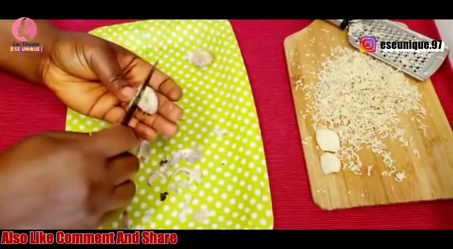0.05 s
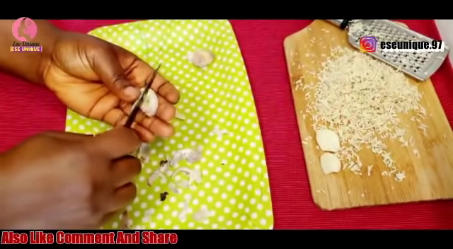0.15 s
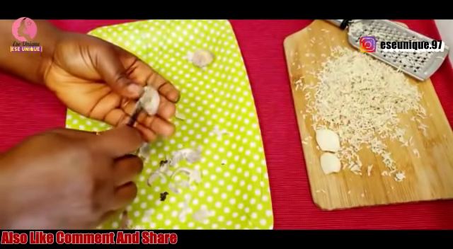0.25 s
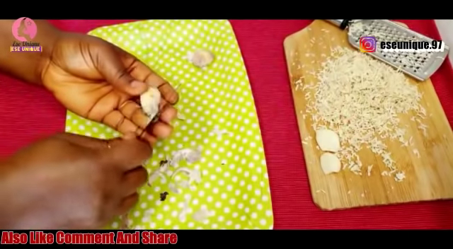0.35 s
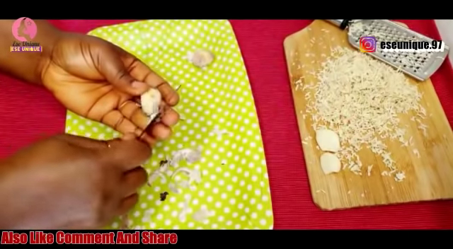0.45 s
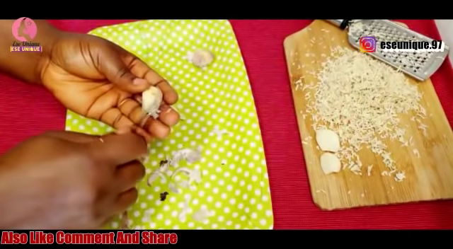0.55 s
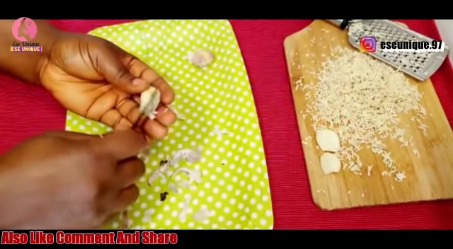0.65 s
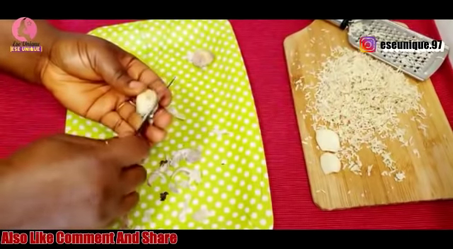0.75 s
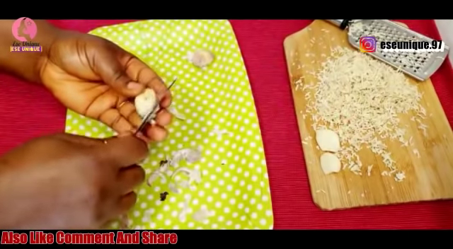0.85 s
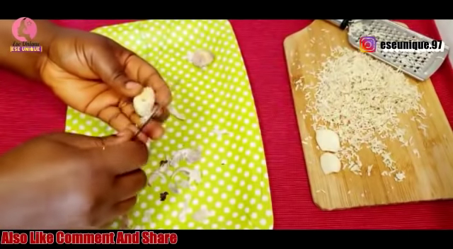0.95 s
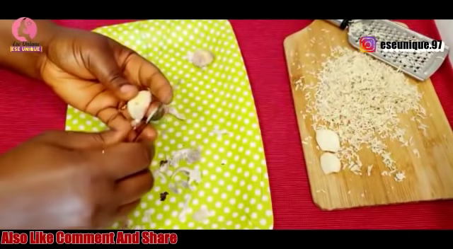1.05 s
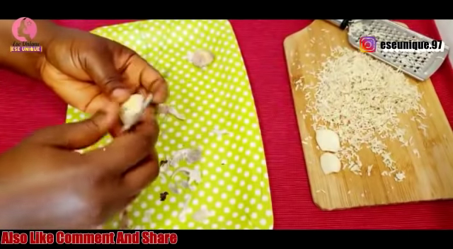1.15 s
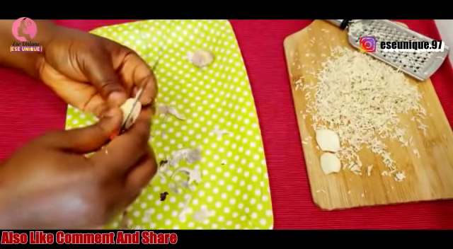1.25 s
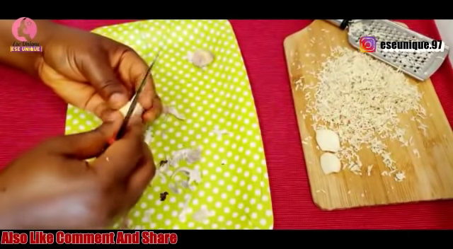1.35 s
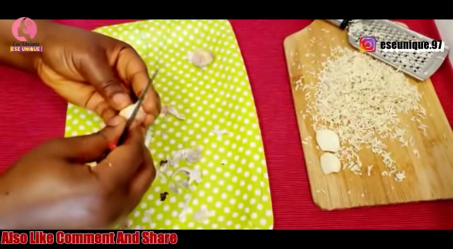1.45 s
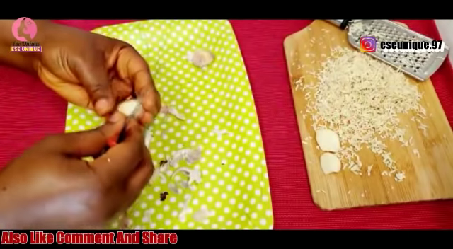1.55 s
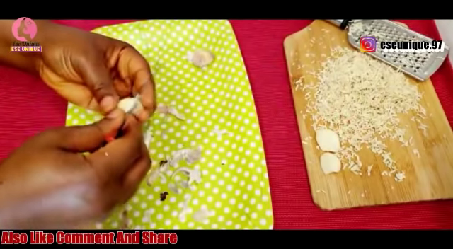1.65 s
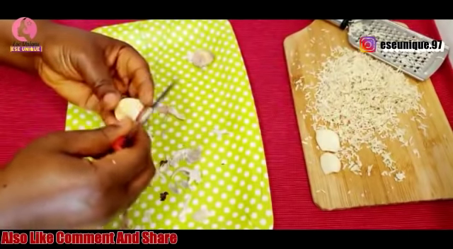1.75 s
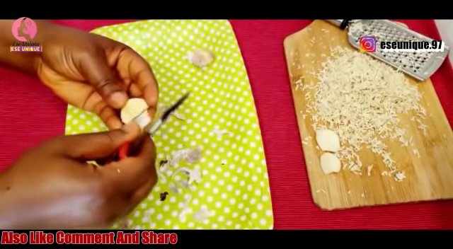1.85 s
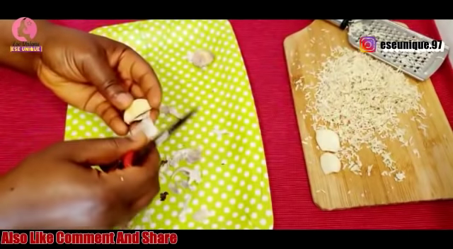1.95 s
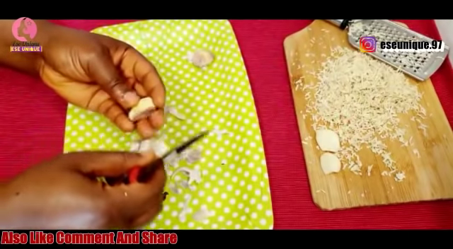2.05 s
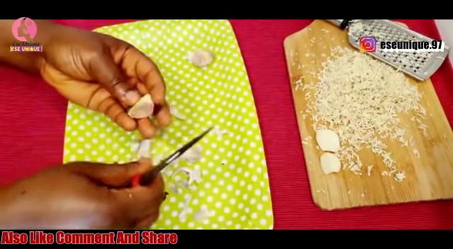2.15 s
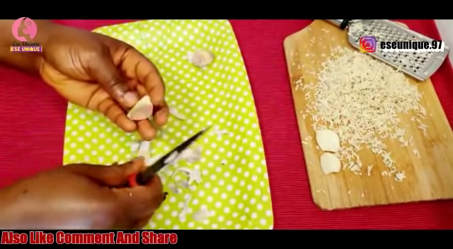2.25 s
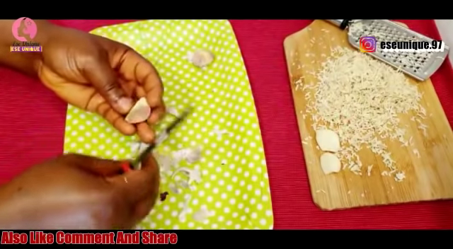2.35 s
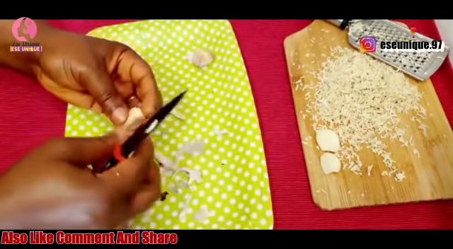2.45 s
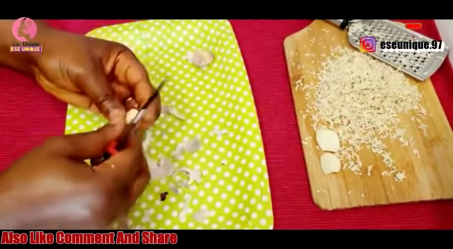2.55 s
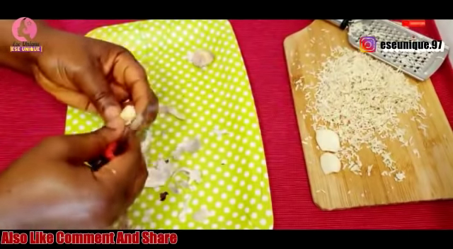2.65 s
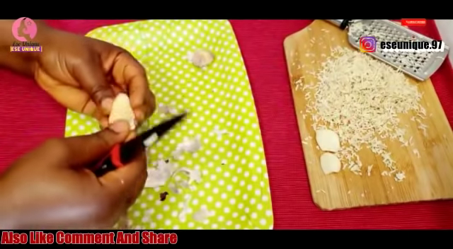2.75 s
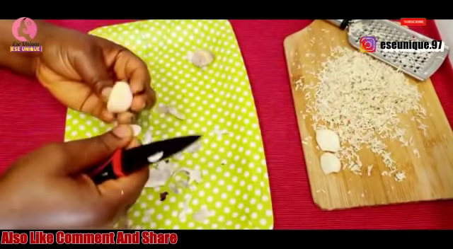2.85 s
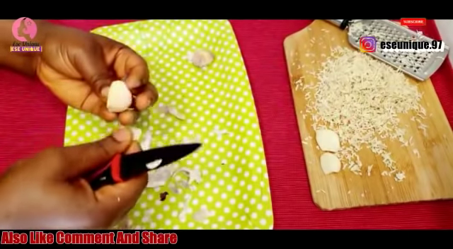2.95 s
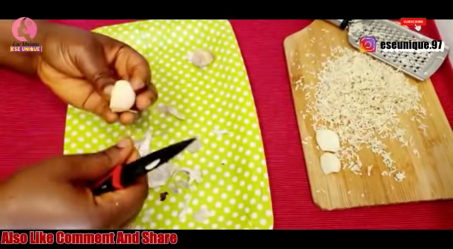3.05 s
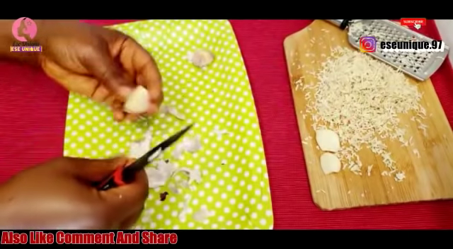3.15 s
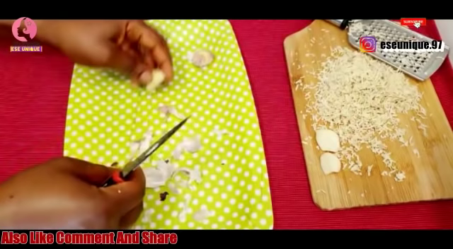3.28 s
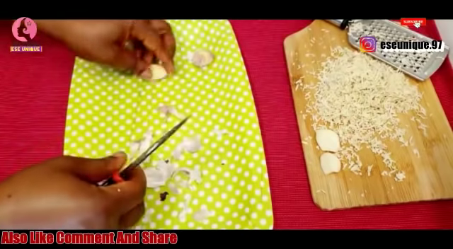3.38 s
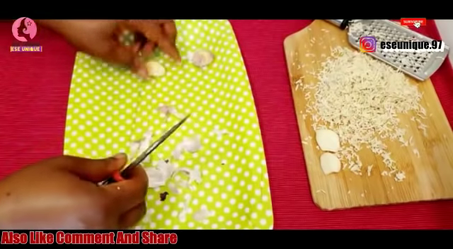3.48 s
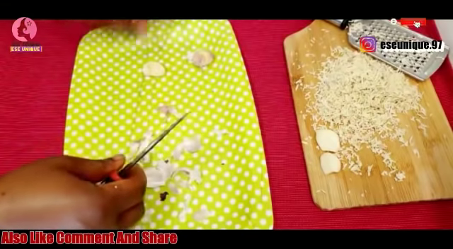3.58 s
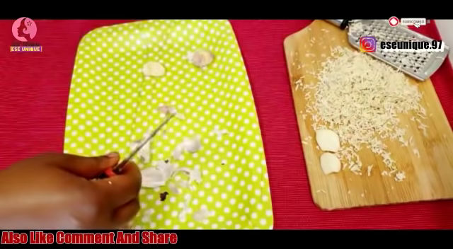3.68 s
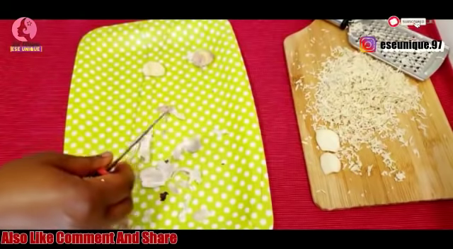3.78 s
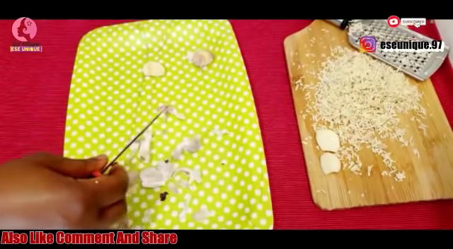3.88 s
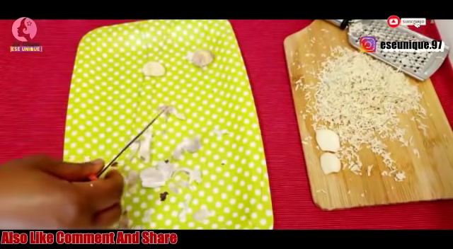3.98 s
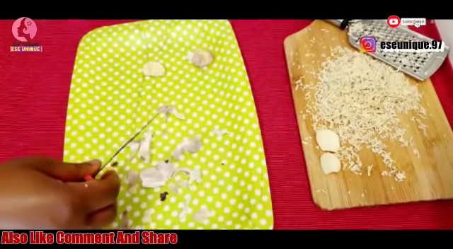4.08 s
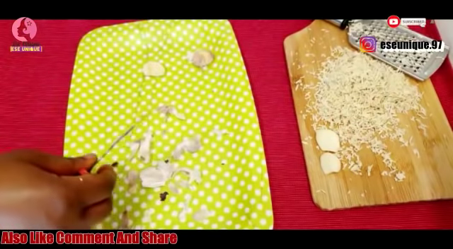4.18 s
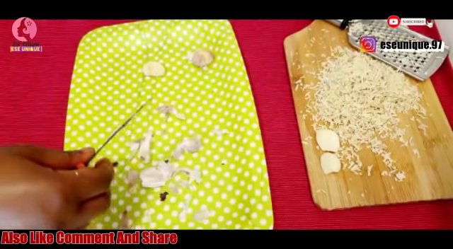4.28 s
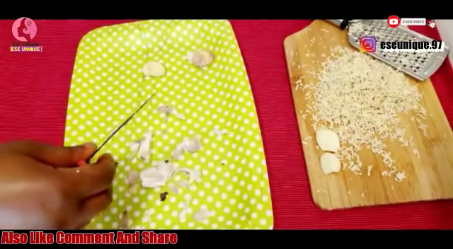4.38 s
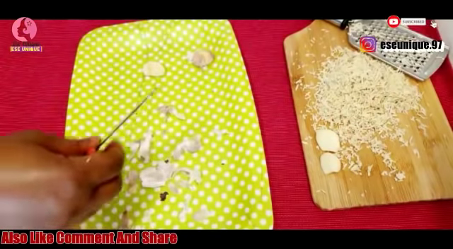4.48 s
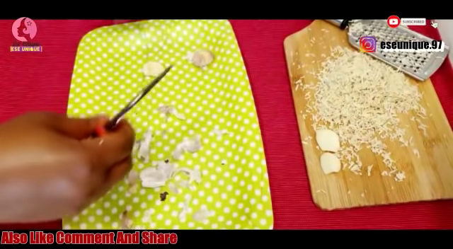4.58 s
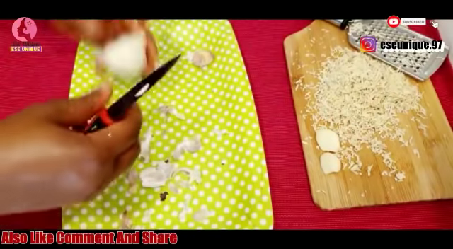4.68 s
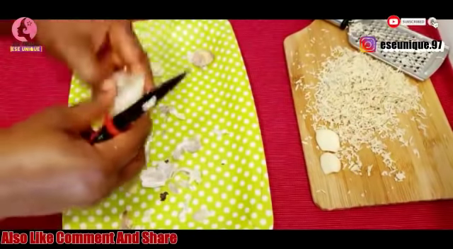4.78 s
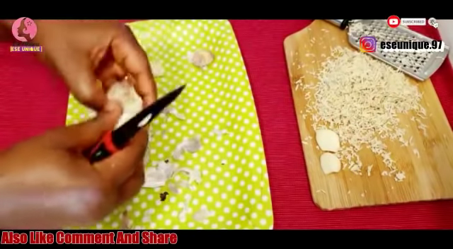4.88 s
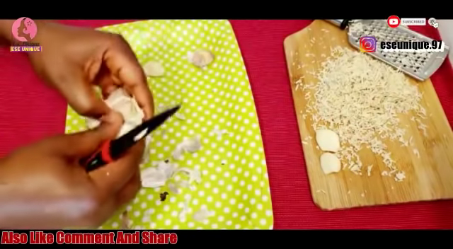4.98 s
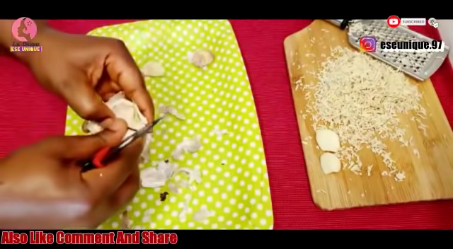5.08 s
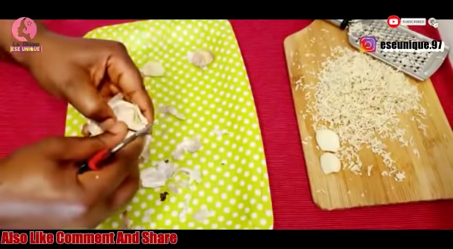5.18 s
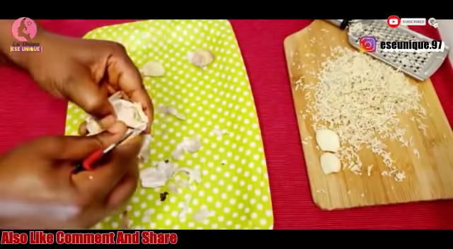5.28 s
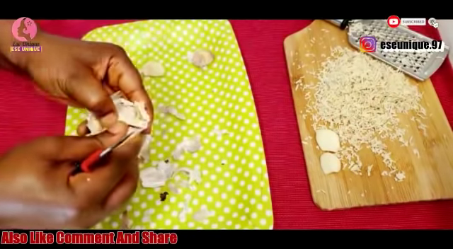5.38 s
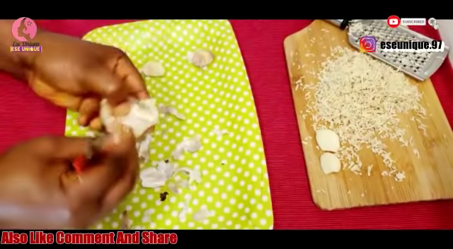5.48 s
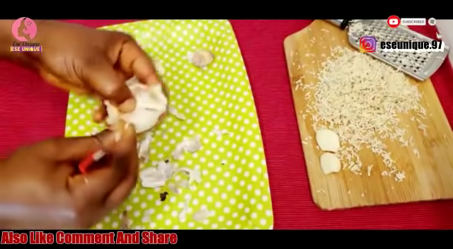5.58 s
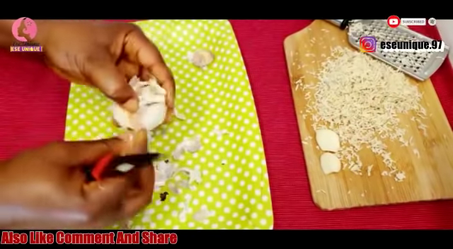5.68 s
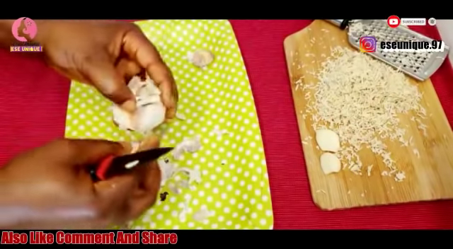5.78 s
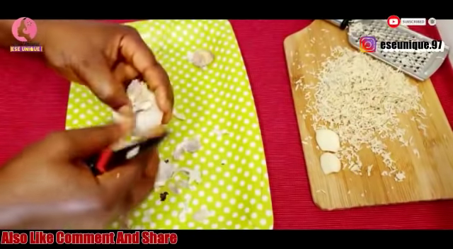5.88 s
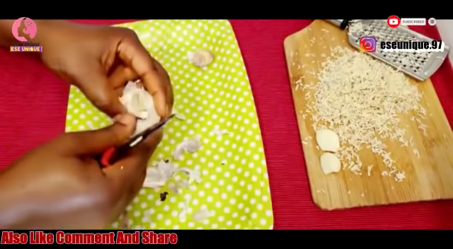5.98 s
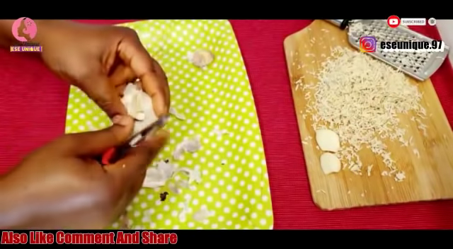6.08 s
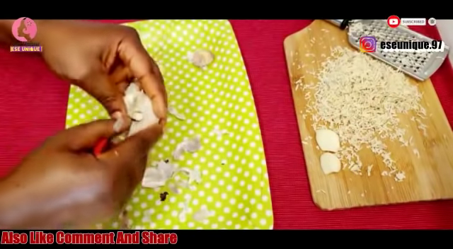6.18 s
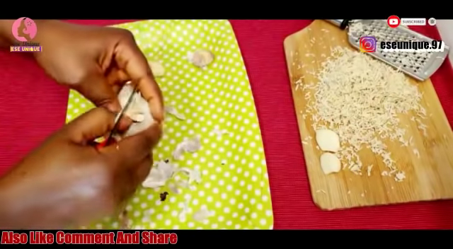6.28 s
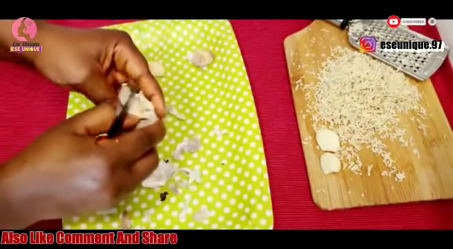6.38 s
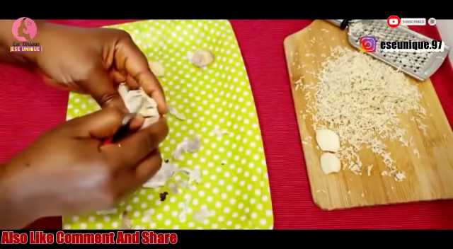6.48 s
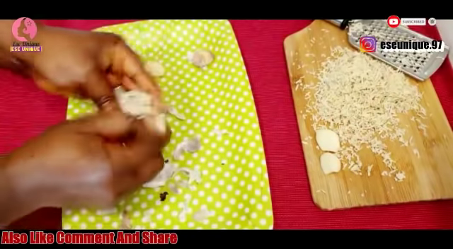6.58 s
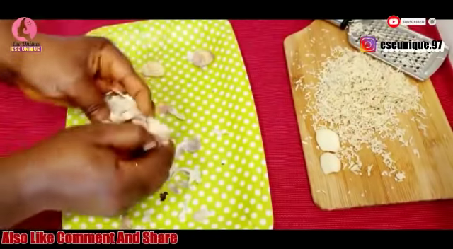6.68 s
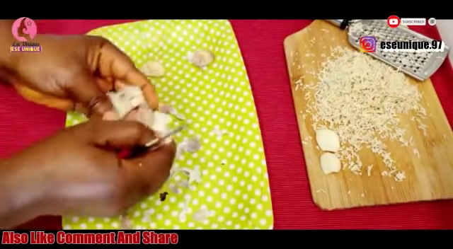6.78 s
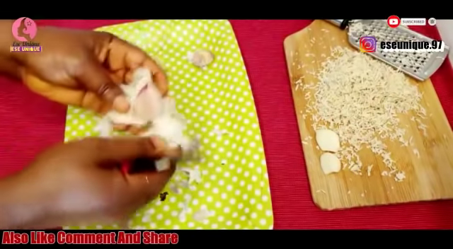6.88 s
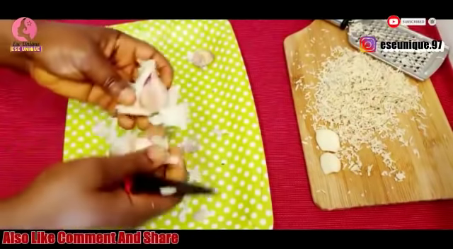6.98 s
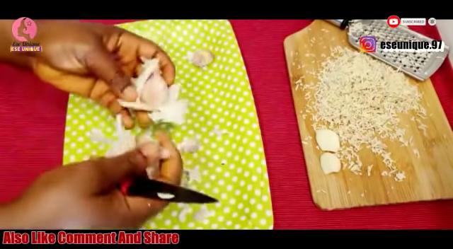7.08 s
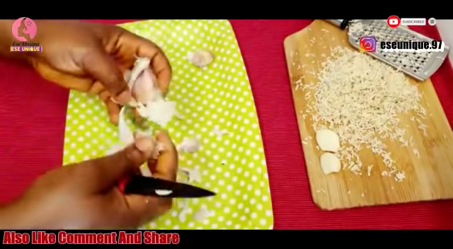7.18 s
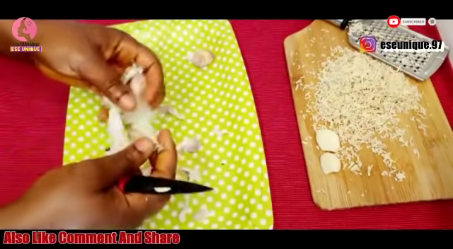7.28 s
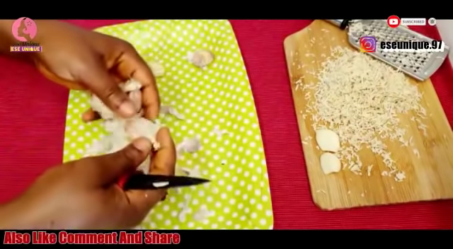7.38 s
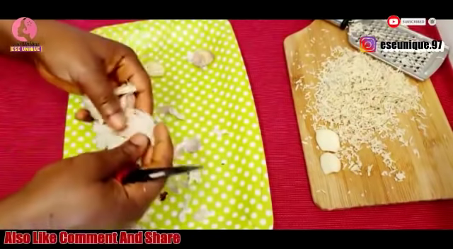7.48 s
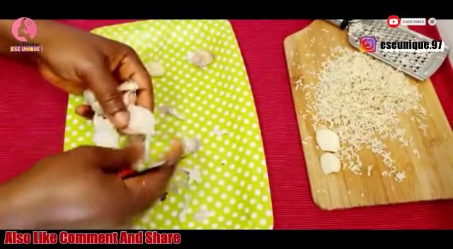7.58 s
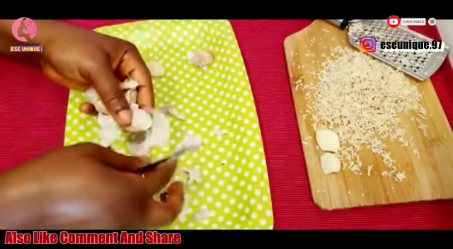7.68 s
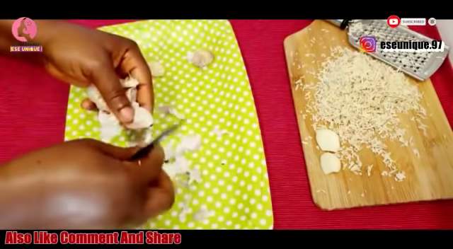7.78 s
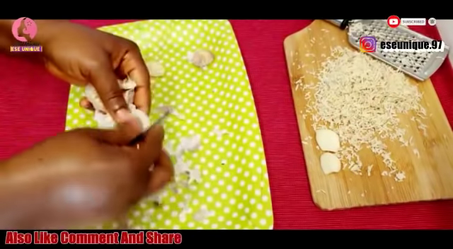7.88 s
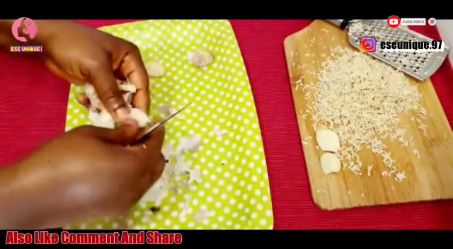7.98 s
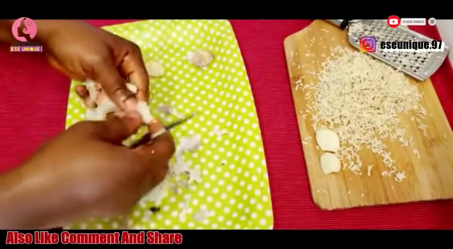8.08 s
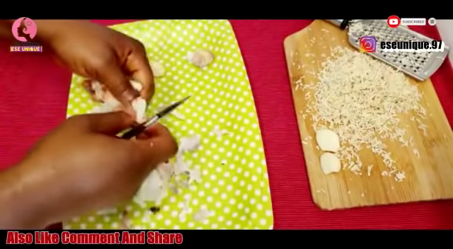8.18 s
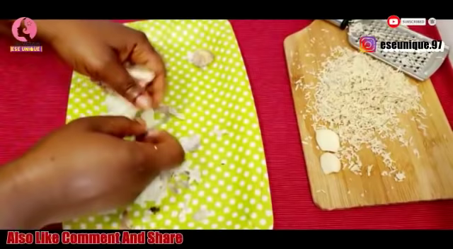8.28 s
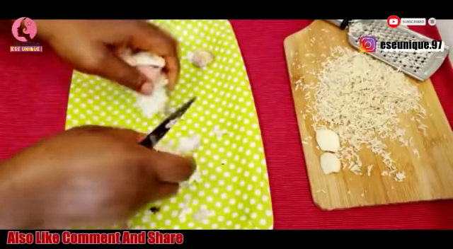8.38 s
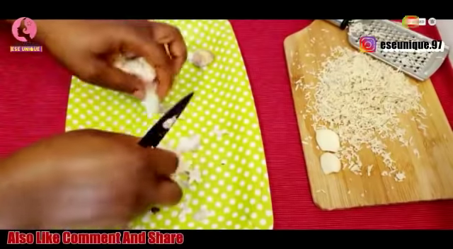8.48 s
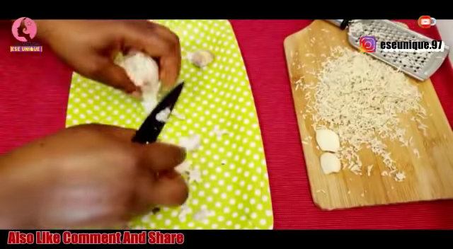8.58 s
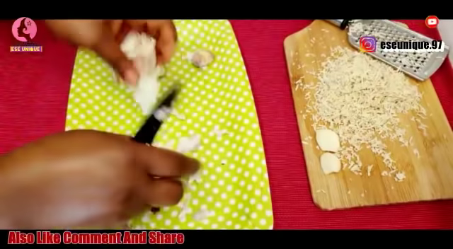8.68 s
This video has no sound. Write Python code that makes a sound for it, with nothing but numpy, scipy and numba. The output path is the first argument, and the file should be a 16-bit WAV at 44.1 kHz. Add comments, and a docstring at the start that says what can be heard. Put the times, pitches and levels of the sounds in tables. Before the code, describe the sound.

Close stereo sound of garlic being peeled in a quiet, slightly live room. Thin dry skin rustles, snaps and tears in short uneven strokes, with two faint blade knocks. A peeled clove drops on a mat with a dull knock and quick little bounces. The rustle nearly vanishes, then peeling resumes, denser and crisper until the end, over faint room air and low hum.

```python
"""Garlic is peeled with a small knife, heard close by in stereo in a quiet, slightly live room.
First the dry skin rustles under fingers and blade (dense tiny clicks), snaps (short noise bursts) and tears
(runs of clicks that ring the hollow husk); the blade knocks twice. Then a peeled clove drops on the mat and
bounces (ringing modes), the rustle falls almost silent, and the peeling starts again, busy until the end.
Bumps and shifting hands come and go; room air (filtered noise) and a faint hum (sines) run throughout."""
import sys
import numpy as np
from scipy import signal
from scipy.fft import rfft, irfft, next_fast_len
from scipy.io import wavfile
from scipy.ndimage import uniform_filter1d
from numba import njit

SR = 44100
rng = np.random.default_rng(int(sys.argv[2]) if len(sys.argv) > 2 else 0)


def digitize_waveform(pressure):
    """Quantize a signal to 16-bit integers and store it at the path in sys.argv[1].

    Rows of a 2-D input are taken as channels; values are limited to [-1, 1].
    """
    field = np.atleast_2d(pressure).T
    bounded = np.clip(field, -1, 1)
    quanta = np.round(bounded * 32767).astype(np.int16)
    wavfile.write(sys.argv[1], SR, quanta)


N = 385434
TIME = np.arange(N) / SR
TOP_HZ = 14500  # upper edge of the sound

# All table levels are relative: the functions below may add an offset or a wavering.
# strokes of thumb and blade over the skin:
# (start [s], end [s], level [dB], body under 2 kHz [dB], brightness [dB per octave])
STROKES = [(0.271, 0.361, -37, 1, 1), (0.464, 0.558, -54.5, 3, -2), (0.65, 0.713, -51, -6, -3.5),
           (0.812, 0.922, -45.5, -7, -5.5), (1.077, 1.212, -63, -38, -15), (1.223, 1.285, -47.5, 5.5, -1),
           (1.353, 1.401, -40, -5, -3.5), (1.478, 1.528, -46.5, -7.5, -5), (1.607, 1.82, -42, -3, -3),
           (1.854, 1.99, -40, 4, 0), (2.15, 2.34, -56, 11, 1), (2.389, 2.459, -53.5, -3, -1.5),
           (2.593, 2.71, -48, 0, -4), (2.708, 2.805, -35.5, -3, -0.5), (3.093, 3.253, -61, 3, -4),
           (3.446, 3.578, -55.5, 6, -2.5), (4.091, 4.206, -43.5, -3, -1.5), (4.492, 4.633, -48, -3, 0.5),
           (4.778, 4.88, -46, -4, -0.5), (4.954, 5.038, -42, -8, -2.5), (5.067, 5.113, -41.5, -3, -3),
           (5.171, 5.39, -38, -9, -2.5), (5.456, 5.573, -34, 3.5, 0), (5.612, 5.685, -38, 5.5, 1.5),
           (5.69, 5.852, -47.5, -7, -0.5), (5.947, 6.066, -50, -5, -1.5), (6.152, 6.283, -39.5, -1, -1.5),
           (6.311, 6.44, -45, 6, -1), (6.43, 6.523, -34.5, -7, -3), (6.619, 6.737, -35, -11, -4),
           (6.73, 6.891, -31.5, 3.5, -0.5), (6.99, 7.073, -42, -5, -2.5), (7.078, 7.122, -40, 0.5, 0),
           (7.15, 7.232, -47.5, 5, -1), (7.256, 7.489, -42, 5, -1), (7.483, 7.512, -34.5, 0.5, -0.5),
           (7.566, 7.675, -51, 6, -0.5), (7.736, 7.772, -53, 10, 3), (7.886, 7.97, -40.5, 1, -0.5),
           (7.967, 8.034, -36, 3.5, -0.5), (8.054, 8.117, -43.5, -9, -3.5), (8.203, 8.264, -44, -2, -3),
           (8.28, 8.325, -36, 3, -2), (8.38, 8.488, -37.5, -8, -5.5), (8.476, 8.57, -42, -3, -3),
           (8.63, 8.69, -52, -11, -1.5)]
# the clove turning in the fingers between strokes; the rustle falls almost silent around 4 s:
# (time [s], level [dB])
HOLD = [(0, -57.5), (.65, -66.5), (2.3, -58), (3.0, -65), (3.77, -67.5), (3.92, -91), (4.02, -77.5),
        (4.075, -52), (4.2, -56), (4.36, -70), (4.5, -56), (4.8, -55), (7.75, -56), (8.74, -55.5)]
# the strongest single cracks of the skin, and at 2.006 s the sharp click of the first blade knock: (time [s],
# level [dB], body under 2 kHz [dB], brightness [dB per octave])
SNAPS = [(.2804, -43, 0, 2), (.293, -38, -4, 2), (.305, -23, -2, 10), (.32, -18.5, -5, 5.5),
         (.8121, -43.5, -2, 9), (.8283, -37, -1, 8), (.8437, -35.5, -8, -1), (.9065, -33, 7.5, -1),
         (1.2759, -40, 17, 3), (1.3344, -45.5, -8, -5), (1.3565, -40, -14, -18), (1.3721, -34.5, -10, 0),
         (1.409, -34, -13, -4), (1.6305, -42, -7, 7), (1.6449, -22, -3, -1.5), (1.6987, -25, 4.5, 0),
         (1.7528, -27.5, 0, 4.5), (1.8442, -21.5, -9, -4), (1.882, -23, 2, 3), (1.892, -16.5, 6, 2.5),
         (1.9102, -28, -8, -8), (1.9545, -29, 6, 6), (1.9776, -33, 7, 5), (2.0059, -27, 12, -1.5),
         (2.1689, -39.5, 7, -3.5), (2.1966, -40.5, 8, -1.5), (2.2419, -42.5, -10, 3),
         (2.5937, -49.5, 1, 1.5), (2.7173, -30, 4, 10), (2.726, -29, -16, 1), (2.7405, -21, -15, 8),
         (2.7848, -24.5, 11.5, 2.5), (4.5803, -39, -22, -14), (4.6195, -37.5, 12, 5.5),
         (4.9039, -41.5, 2, -5), (4.9531, -34, -23, -4.5), (5.0989, -36.5, 12, 4), (5.1704, -33, -12, -1.5),
         (5.1897, -35, 7, 0.5), (5.2124, -35, -21, -1), (5.217, -31.5, -11, -2), (5.2438, -30.5, -13, -1),
         (5.2568, -24, 4, 6), (5.2785, -20, 1, 3), (5.2896, -25, -13, 0), (5.3295, -30.5, -18, -1.5),
         (5.345, -29.5, -10, 9), (5.3638, -27, -13, 7), (5.3995, -28.5, -2, -0.5), (5.4101, -30.5, -6, 1),
         (5.429, -16.5, 3, 4), (5.4492, -14, 5, 6.5), (5.537, -35, 5, -2), (5.7282, -33.5, 2, 0),
         (5.7514, -37, 0, -8.5), (5.9422, -44.5, -11, 1), (6.0943, -43.5, -7, 0.5),
         (6.1692, -33.5, 2, -1.5), (6.2062, -36, -6, -1), (6.2165, -38.5, -11, 1), (6.293, -38, 0, -1),
         (6.309, -32, -14, 8), (6.3669, -42, -5, -4), (6.5074, -30, -7, -6.5), (6.542, -29, -5, 2),
         (6.5857, -21.5, -1, 0), (6.6024, -14, -13, 3.5), (6.7518, -30, -16, -2), (7.0254, -39.5, -9, 0),
         (7.0597, -34.5, -5, 4), (7.1462, -37.5, -3, 7), (7.1798, -38.5, 10, -0.5), (7.244, -42, 10, 16),
         (7.3343, -35, 4, 1), (7.3826, -32, -4, 0), (7.4134, -29.5, -14, -0.5), (7.4256, -33, 2, 0),
         (7.4787, -28, 1, 8), (7.4849, -30.5, 0, 2), (7.5546, -44, 3, -3), (7.6706, -43.5, 6, -1),
         (7.9287, -43.5, -6, -4), (8.0154, -33.5, 1, -0.5), (8.0721, -39, -8, -1), (8.1409, -39, -12, 3),
         (8.1596, -38, -14, -2), (8.2272, -43, -20, -9), (8.2847, -35.5, -10, 6), (8.3857, -32, 1, 4),
         (8.67, -43.5, -11, -1)]
# strips torn off: (start [s], end [s], level [dB], body [dB], brightness [dB per octave],
# husk resonance at the start [Hz], its lift [dB])
TEARS = [(0.306, 0.328, -28, -9.5, 0.5, 2220, 1), (0.683, 0.71, -42, 2, 4.5, 3620, -13),
         (1.703, 1.712, -26.5, -3, 1.5, 4450, -5), (1.892, 1.924, -30.5, 8, 0.5, 3280, 7),
         (1.948, 1.965, -30.5, 3.5, 0, 3080, -2), (2.741, 2.794, -26.5, -12, 0, 3000, -4),
         (5.268, 5.3, -31, -3.5, 1, 3320, -6), (5.441, 5.47, -19, -4.5, 1, 3150, 5.5),
         (5.45, 5.484, -23, 2, 2.5, 2010, 13), (5.533, 5.555, -33.5, 0, 0, 2110, 5),
         (5.722, 5.763, -39, 10.5, 3, 2420, -2), (6.595, 6.647, -21.5, -3, -0.5, 2020, 5),
         (6.644, 6.686, -28.5, 3, 3, 3060, 0)]
# resonances of the husk, lowest first: (multiple of the lowest [ratio], level [dB])
HUSK_MODES = [(1, 2), (1.52, -7.5), (1.9, -5.5)]
# tone colour of dry skin: (frequency [Hz], level [dB])
SKIN_COLOUR = [(150, -27), (400, -22), (650, -18), (950, -12), (1400, -10), (1800, -9), (2300, -3),
               (2700, -5), (3200, -3), (4800, -1.5), (7500, -1), (11000, 0), (14000, -4.5)]
# the blade slips through and knocks on the clove:
# (time [s], level [dB], contact softness as a cut-off [Hz])
BLADE_KNOCKS = [(2.0068, -29, 1750), (2.784, -33.5, 1280)]
# ringing of the hand-held knife: (rough frequency [Hz], time to fall 60 dB [s], level [dB])
KNIFE_MODES = [(384, 0.045, -8.5), (1004, 0.033, -6.5), (1130, 0.018, 1), (1326, 0.011, 0)]
# the clove lands on the mat and bounces: (time [s], level [dB], contact softness as a cut-off [Hz])
CLOVE_KNOCKS = [(3.3944, -22, 2530), (3.4475, -25, 2950), (3.4655, -36, 2180), (3.475, -38, 2600)]
# ringing of clove on mat: (rough frequency [Hz], time to fall 60 dB [s], level [dB])
CLOVE_MODES = [(416, 0.13, -23.5), (640, 0.02, -16), (970, 0.028, -16), (1260, 0.013, 2),
               (1470, 0.0034, 10), (2120, 0.0041, -3), (3500, 0.005, -25)]
# soft bumps that reach the table: (time [s], level [dB], contact softness as a cut-off [Hz])
BUMPS = [(.329, -54, 131), (1.385, -75, 130), (2.785, -48.5, 900), (3.398, -42.5, 1000), (3.452, -41, 800),
         (3.51, -45, 131), (6.368, -44.5, 690), (6.612, -42, 124), (8.03, -66, 130)]
# ringing of the table top: (rough frequency [Hz], time to fall 60 dB [s], level [dB])
TABLE_MODES = [(83.6, .25, -5), (102.9, 0.28, 8.5), (180, 0.22, 4.5), (230.7, 0.23, 2), (320, 0.2, 1.5),
               (445, 0.18, 0), (652, 0.14, 7.5)]
# a hand shifts its grip and leans on the table:
# (middle [s], length [s], dull rubbing [dB], table rumble [dB])
GRIPS = [(0.345, 0.25, -59.5, -52), (0.826, 0.65, -57, -69), (1.22, 0.69, -64.5, -55.5),
         (1.88, 0.79, -57.5, -53.5), (2.935, 0.75, -61, -69), (4.25, 0.38, -68, -57),
         (5.121, 0.79, -65, -52.5), (5.908, 0.76, -61.5, -56), (6.738, 0.78, -64, -55.5),
         (7.465, 0.49, -62, -52), (8.113, 0.44, -72, -54.5), (8.5, 1, -59.5, -56)]
# tone colour of the dull rubbing: (frequency [Hz], level [dB])
RUB_COLOUR = [(110, -28.5), (180, -8.5), (228, -0.5), (300, -2.5), (450, -7.5), (800, -14.0), (2500, -41.0)]
# tone colour of the table rumble: (frequency [Hz], level [dB])
RUMBLE_COLOUR = [(30, -25.0), (55, -4.5), (75, -10.5), (102, 3.5), (160, -16.5), (600, -56.5)]
# appliance hum: (frequency [Hz], level [dB])
HUM = [(49, -70.5), (98, -68), (148, -70)]
# tone colour of room air: (frequency [Hz], level [dB])
AIR_COLOUR = [(25, -31), (37, -14), (50, -3), (75, -3.5), (105, -7), (170, -9.5), (310, -13), (410, -6.5),
              (520, -16), (650, -11), (950, -22), (1500, -26.5), (2100, -37.5), (2400, -24), (3000, -31.5),
              (14000, -46.5)]

# a stroke takes hold, presses hardest midway and lets go
STROKE_ATTACK_S, STROKE_RELEASE_S, STROKE_ARCH_DB = 0.024, 0.03, 1.5
HOLD_BODY_DB, HOLD_BRIGHT_DB_PER_OCT = -1.5, -4
# a gently drifting resonance colours the rustle
PEAK_HZ, PEAK_Q, PEAK_DB, PEAK_DRIFT_OCT = 2450, 6, -8.5, 0.12
# weaker cracks are tried by chance, and sound only where the rubbing is firm enough
TICK_TRIES_PER_S, TICK_FROM_DB = 12, -54
TICK_DB, TICK_SPREAD_DB, TICK_BODY_DB, TICK_BRIGHT_SPREAD_DB_PER_OCT = -1.5, 6.5, -12.5, 5
# all husk resonances sink as a strip comes free
HUSK_Q, HUSK_SAG_OCT_PER_S = 13, 1.4
REST_RUB_DB, REST_LEAN_DB = -73, -68  # hands at rest


def strokes():
    """Level, body and brightness of the rubbing: the powers of strokes and light hold add up."""
    power = undb(np.interp(TIME, *np.transpose(HOLD))) ** 2
    body = power * HOLD_BODY_DB
    bright = power * HOLD_BRIGHT_DB_PER_OCT
    t = np.arange(SR // 2) / SR
    for start, end, db, body_db, tilt_db in STROKES:
        length = end - start
        arch = np.sin(np.pi * np.minimum(t / length, 1)) - 1
        attack = np.minimum(t / STROKE_ATTACK_S, 1)
        release = np.exp(-np.maximum(t - length, 0) / STROKE_RELEASE_S)
        stroke = (attack * release * undb(db + STROKE_ARCH_DB * arch)) ** 2
        add(power, start, stroke)
        add(body, start, stroke * body_db)
        add(bright, start, stroke * tilt_db)
    # where several overlap, the louder one decides more of the colour
    return 10 * np.log10(power), body / power, bright / power


def rustle(db, body_db, tilt_db):
    """Rubbing sets off dense micro-cracks in fits and starts, coloured by a gently drifting resonance."""
    clicks = unit(fractures(N, rate=700, spread_db=1.0) + 0.9 * rng.standard_normal((2, N)))
    peak_hz = PEAK_HZ * 2 ** (PEAK_DRIFT_OCT * walk(2.6))
    clicks = clicks + undb(PEAK_DB) * moving_resonance(clicks, peak_hz, PEAK_Q)
    n = next_fast_len(N)
    spectrum = rfft(clicks, n)
    hz = np.arange(n // 2 + 1) * SR / n
    colour = skin_gain(hz, 0, 0)
    # split into overlapping bands, so that body and brightness can change with time
    centres = np.geomspace(900, TOP_HZ, num=8)
    out, power = 0, 0
    for centre, pick in zip(centres, np.eye(len(centres))):
        band = np.interp(np.log(hz + 1), np.log(centres), pick) * colour
        gain = skin_gain(centre, body_db, tilt_db) / skin_gain(centre, 0, 0)
        out = out + gain * irfft(spectrum * band, n)[:, :N]
        power = power + gain ** 2 * np.mean(band * colour)
    flutter_db = 0.78 * walk(90)
    return out / np.sqrt(power) * undb(db - 2.5 + flutter_db)


def snaps(table):
    """Each crack opens and rings one flake for about a millisecond, then the edge crumbles briefly."""
    rise_s, ring_s, crumble_s = .001, 0.0013, 0.015
    out = np.zeros((2, N))
    t = np.arange(SR // 20) / SR - .004  # starts 4 ms early, for the opening
    for s, db, body_db, tilt_db in table:
        age = np.maximum(t, 0)
        opening = np.exp(2 * np.minimum(t, 0) / rise_s)
        noise = rng.standard_normal(len(t)) + 2.2 * rng.standard_normal((2, len(t)))
        crack = noise * np.exp(-age / ring_s)
        crumbs = fractures(len(t), rate=1500, spread_db=1.5) * np.exp(-age / crumble_s) * undb(-17)
        flake_hz = 2800 * 4 ** rng.random()

        def colour(hz):
            flake_db = 5 / (1 + (6 * (hz / flake_hz - 1)) ** 2)
            return skin_gain(hz, body_db, tilt_db) * undb(flake_db)

        x = shape((crack + crumbs) * opening, colour)
        # level counts all the energy as if it filled 3 ms
        energy = np.sum(x ** 2) / (2 * .003 * SR)
        add(out, s + t[0] + rise_s / 2, x / np.sqrt(energy) * undb(db + 3.5))
    return out


def ticks(rub_db):
    """Chance cracks as rows like those of SNAPS; harder rubbing makes them louder."""
    rows = []
    for when, size, colour in rng.random((int(TICK_TRIES_PER_S * N / SR), 3)):
        db = rub_db[int(when * N)]
        if db > TICK_FROM_DB:
            level_db = db + TICK_DB + TICK_SPREAD_DB * (2 * size - 1)
            tilt_db = TICK_BRIGHT_SPREAD_DB_PER_OCT * (2 * colour - 1)
            rows.append((when * N / SR, level_db, TICK_BODY_DB, tilt_db))
    return rows


def tears():
    """A crack runs across the fibres, breaking them one by one; the hollow husk rings with the run."""
    out = np.zeros((2, N))
    t = np.arange(SR // 8) / SR
    for start, end, db, body_db, tilt_db, husk_hz, husk_db in TEARS:
        release = np.exp(-np.maximum(t - (end - start), 0) / 0.0074)
        pull = np.minimum(t / 0.0033, 1) * release
        fibres = fractures(len(t), rate=2400, spread_db=0.5)
        hz = husk_hz * 2 ** (-HUSK_SAG_OCT_PER_S * t)
        husk = 0
        for multiple, mode_db in HUSK_MODES:
            husk = husk + undb(husk_db + mode_db) * moving_resonance(fibres, multiple * hz, HUSK_Q)
        x = shape(unit(fibres + husk) * pull, lambda hz: skin_gain(hz, body_db, tilt_db))
        add(out, start, x * undb(db + 1.0))
    return out


def fractures(n, rate, spread_db, ring_s=0.00056, apart=0.89):
    """Tiny cracks of uneven size, each a very short burst; flakes face different ways, so the ears differ."""
    happens = rng.random(n) < rate / SR
    size = undb(spread_db * np.minimum(rng.exponential(size=n), 3.5)) * happens
    pole = np.exp(-2 / (ring_s * SR))
    energy = signal.lfilter([1], np.poly([pole, pole]), size ** 2)
    noise = rng.standard_normal(n) + apart * rng.standard_normal((2, n))
    return unit(np.sqrt(np.abs(energy)) * noise)


def skin_gain(hz, body_db, tilt_db):
    """Spectrum of dry skin: big flakes add body, small ones brightness."""
    body = 1 / (1 + (hz / 2100) ** 6)
    octaves = np.log2(np.clip(hz, 2500, TOP_HZ) / 6500)
    return contour(SKIN_COLOUR, hz) * undb(body_db * body + tilt_db * octaves) * (hz < TOP_HZ + 1000)


def flicker(x, depth_db, rate, count=20):
    """The tone colour is patchy: each narrow band wavers in level on its own."""
    n = next_fast_len(N)
    spectrum = rfft(x, n)
    hz = np.arange(n // 2 + 1) * SR / n
    place = np.interp(np.log(hz + 1), np.log([700, TOP_HZ]), [0, count - 1])
    out = 0
    for k in range(count):
        band = irfft(spectrum * np.maximum(1 - abs(place - k), 0), n)[:, :N]
        out = out + band * undb(depth_db * walk(rate))
    return out


def blade_knocks():
    """The blade hits the clove and rings the hand-held knife."""
    return blows(BLADE_KNOCKS, KNIFE_MODES, rise_s=0.00042, span_s=0.0027, contact_db=-23)


def clove_drop():
    """The clove hits the mat and bounces, with short dull ringing."""
    return blows(CLOVE_KNOCKS, CLOVE_MODES, rise_s=0.00032, span_s=0.0025, contact_db=-5)


def table_bumps():
    """Soft, slow-rising bumps ring the table top."""
    return blows(BUMPS, TABLE_MODES, rise_s=0.0065, span_s=.03, contact_db=-11.0)


def blows(table, modes, rise_s, span_s, contact_db):
    """Blows ring modes, with a short contact noise; softer contact is duller. Level: first span_s."""
    out = np.zeros(N)
    t = np.arange(SR // 2) / SR
    for s, db, soft_hz in table:
        ring = 0
        for hz, t60, mode_db in modes:
            pitch = hz * (1 + 0.014 * rng.standard_normal())  # each blow differs a little
            ring = ring + undb(mode_db - 60 * t / t60) * np.sin(2 * np.pi * pitch * t)
        contact = undb(contact_db) * rng.standard_normal(len(t)) * np.exp(-t / 0.005)
        onset = 1 - np.exp(-(t / rise_s) ** 2)
        blow = lowpass((ring + contact) * onset, soft_hz)
        add(out, s, blow * undb(db) / np.std(blow[:int(span_s * SR)]))
    return out


def room(x, near_db=-7, near_s=0.032, far_db=-10.0, low_t60=0.39, high_t60=0.28):
    """Quick scatter from hands and table, then the walls, with separate fading times for bass and treble."""
    t = np.arange(SR // 2) / SR
    near, far = rng.standard_normal((2, 2, len(t)))
    near = near * undb(-60 * t / near_s) * (t > .001)
    low = lowpass(far, 5200)
    far = low * undb(-60 * t / low_t60) + (far - low) * undb(-60 * t / high_t60)
    far = far * np.clip(t / 0.0072 - .5, 0, 1)
    response = (undb(near_db) * unit(near) + undb(far_db) * unit(far)) / np.sqrt(len(t))
    return signal.fftconvolve(x, response, axes=1)[:, :N]


def grips():
    """Levels (dB) of dull rubbing and table rumble: each shift of grip swells and fades evenly."""
    rub, lean = undb(REST_RUB_DB) ** 2, undb(REST_LEAN_DB) ** 2
    for middle, length, rub_db, lean_db in GRIPS:
        swell = np.cos(np.pi * np.clip((TIME - middle) / length, -.5, .5))
        rub = rub + (swell * undb(rub_db)) ** 2
        lean = lean + (swell * undb(lean_db)) ** 2
    return 10 * np.log10(rub), 10 * np.log10(lean)


def shifting_hands():
    """Hands rub dully (noise in stereo) and lean on the table (low noise, alike on both sides)."""
    rub_db, lean_db = grips()
    rub = rng.standard_normal(N) + 0.51 * rng.standard_normal((2, N))
    rub = unit(shape(rub, lambda hz: contour(RUB_COLOUR, hz)))
    rumble = shape(rng.standard_normal(N), lambda hz: contour(RUMBLE_COLOUR, hz))
    return rub * undb(rub_db - 1) + rumble * undb(lean_db - 1)


def appliance_hum():
    """Low tones, each wavering in level and slightly in phase."""
    out = 0
    for hz, db in HUM:
        tone = np.sqrt(2) * np.sin(2 * np.pi * hz * TIME + 0.59 * walk(3.1))
        out = out + undb(db + 2 * walk(5.5)) * tone
    return out


def room_air():
    """Coloured noise, a common part plus a left-right difference; the bass differs less."""
    mid, side = shape(rng.standard_normal((2, N)), lambda hz: contour(AIR_COLOUR, hz))
    side = side - 0.59 * lowpass(side, 450, order=1)
    air = mid + 0.76 * side * np.array([[1], [-1]])
    return undb(-63.5 + 0.2 * walk(6.5)) * air


def undb(db):
    """Decibels to gain."""
    return 10 ** (np.asarray(db) / 20)


def unit(x):
    """Scale to rms 1."""
    return x / np.sqrt(np.mean(x ** 2) + 1e-18)


def add(out, s, x):
    """Mix x into out from time s."""
    i = max(int(s * SR), 0)
    out[..., i:i + x.shape[-1]] += x[..., :max(N - i, 0)]


def contour(points, hz):
    """Gain of a (Hz, dB) spectrum at the given frequencies."""
    f, db = np.transpose(points)
    return undb(np.interp(np.log(hz + 1), np.log(f), db))


def shape(x, gain):
    """Filter x by gain(Hz), keeping the power of white noise."""
    n = next_fast_len(x.shape[-1])
    g = gain(np.arange(n // 2 + 1) * SR / n)
    return irfft(rfft(x, n) * unit(g), n)[..., :x.shape[-1]]


def lowpass(x, hz, order=2):
    """Plain low-pass: weakens what lies above hz."""
    return signal.sosfilt(signal.butter(order, min(hz, .45 * SR), fs=SR, output="sos"), x)


def walk(rate):
    """Slow random drift around 0, spread near 1: random steps, rate per second, smoothed twice."""
    k = int(SR / rate)
    steps = np.repeat(rng.standard_normal(N // k + 1), k)
    return 2.12 * uniform_filter1d(uniform_filter1d(steps, k), k)[:N]


@njit
def resonate(x, hz, q):
    """Band-pass with a moving centre, gain 1 there."""
    y, b, l = np.empty(len(x)), 0., 0.  # b and l are the filter's two memories
    for i in range(len(x)):
        g = np.tan(np.pi * min(hz[i], .45 * SR) / SR)
        v = (b + g * (x[i] - l)) / (1 + g * (g + 1 / q))
        b, l, y[i] = 2 * v - b, l + 2 * g * v, v / q
    return y


def moving_resonance(x, hz, q):
    """What a resonance with a moving pitch adds to both channels."""
    return np.array([resonate(side, hz, float(q)) for side in x])


def scene():
    """Hands and clove reach the left side first; the mat lies further off, so its knocks carry more room."""
    rub_db, body_db, bright_db = strokes()
    crackle = flicker(rustle(rub_db, body_db, bright_db) + tears(), depth_db=2.6, rate=80)
    skin = crackle + snaps(SNAPS + ticks(rub_db))
    hands = skin + blade_knocks()
    clove = clove_drop()
    near = hands + clove
    direct = np.array([near[0], np.roll(near[1], shift=2)])  # right side 2 samples later
    mat_echo = room(np.array([clove, clove]), near_db=-4.5, near_s=0.14,
                    far_db=-1.5, low_t60=0.2, high_t60=0.35)
    walls = room(hands) + mat_echo
    # the right side is a little stronger
    sides = undb([[-.5], [.5]])
    background = shifting_hands() + appliance_hum() + room_air()
    return (direct + walls) * sides + table_bumps() + background


def record(dry):
    """Soft limiting rounds the sharpest peaks, then a low-pass cuts the top."""
    rounded = np.tanh(1.3 * dry) / 1.3
    return signal.sosfilt(signal.ellip(12, .2, 80, TOP_HZ, fs=SR, output="sos"), rounded)


dry = scene()
out = record(dry)
digitize_waveform(out)
```